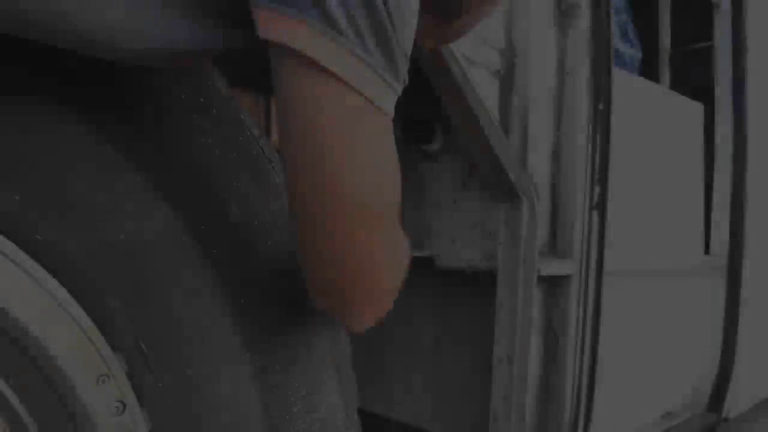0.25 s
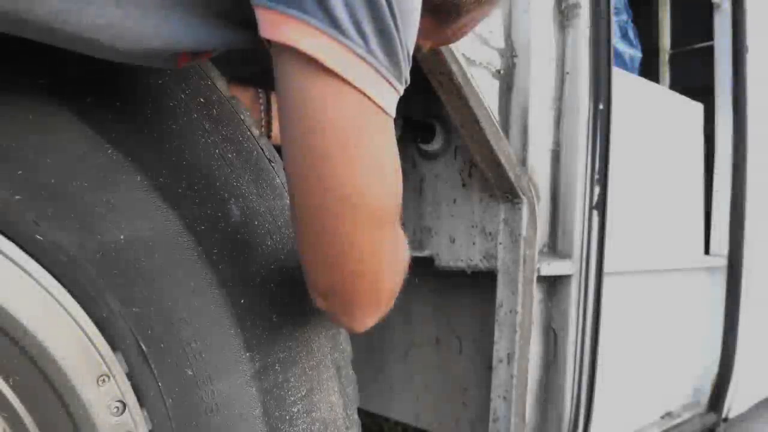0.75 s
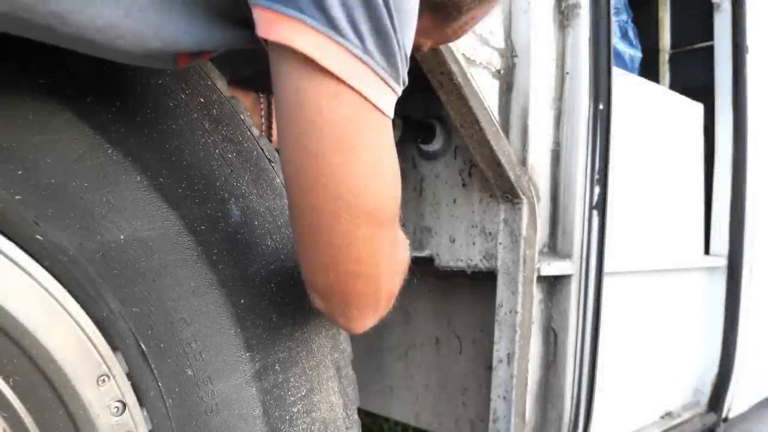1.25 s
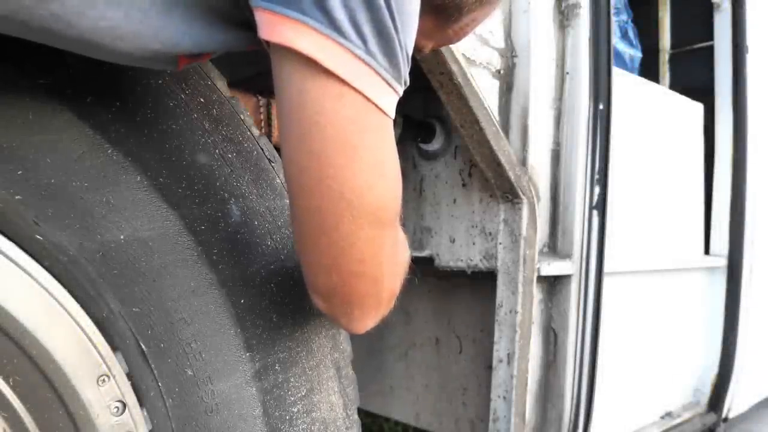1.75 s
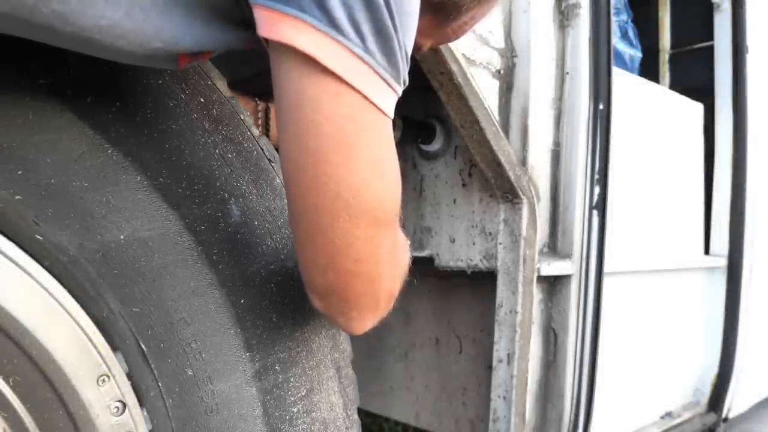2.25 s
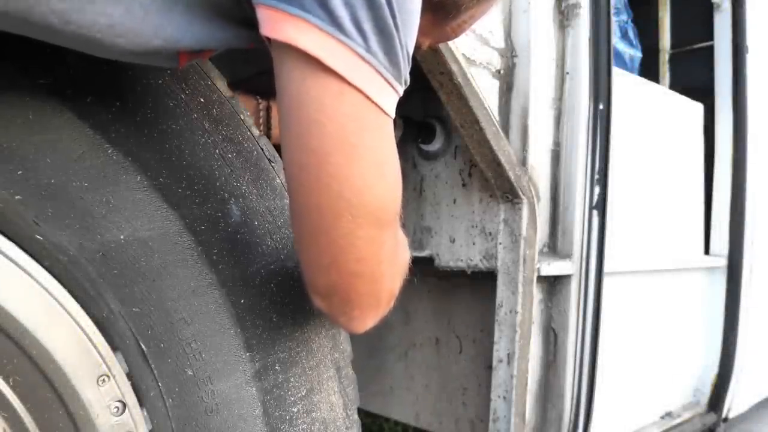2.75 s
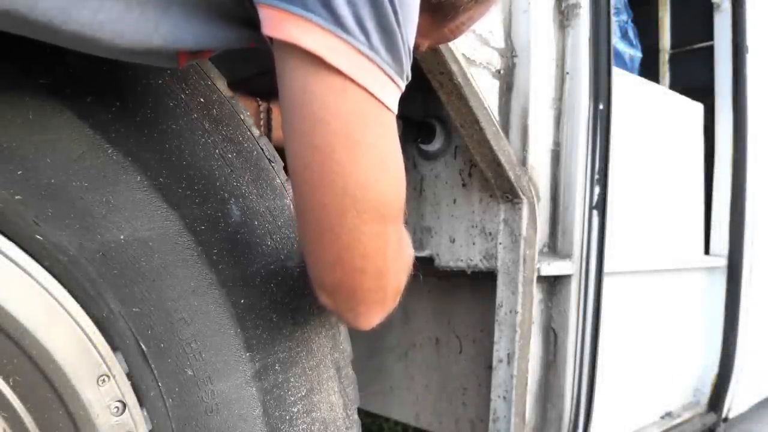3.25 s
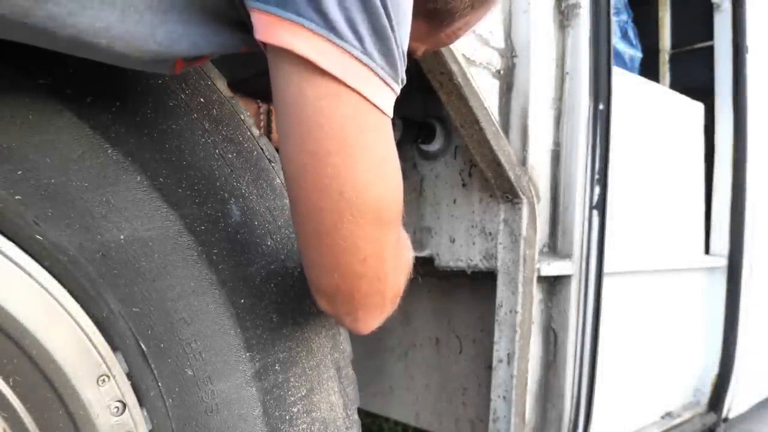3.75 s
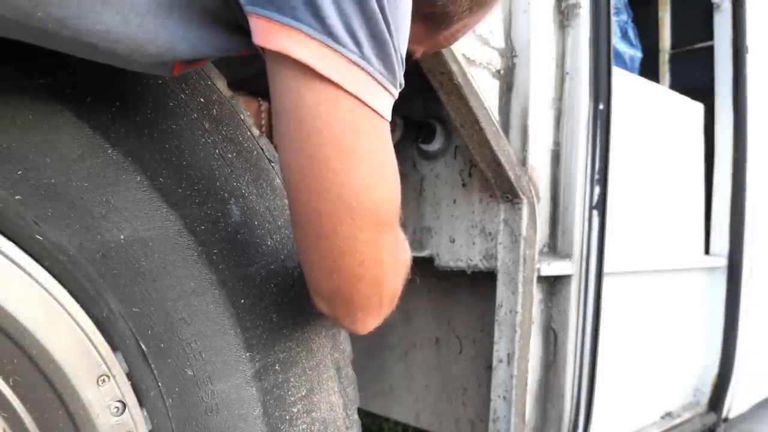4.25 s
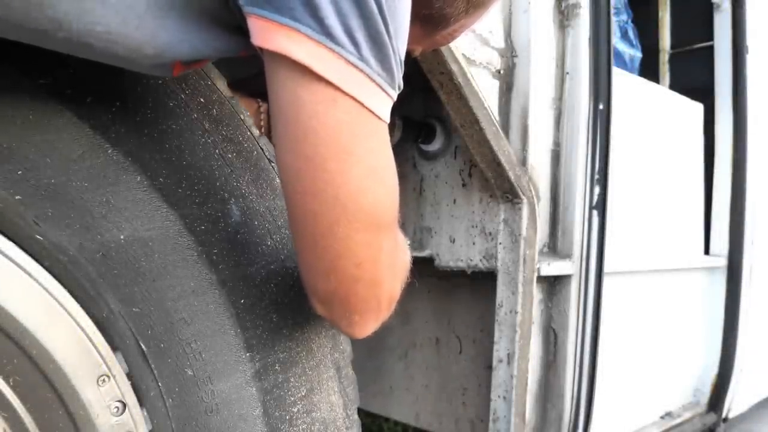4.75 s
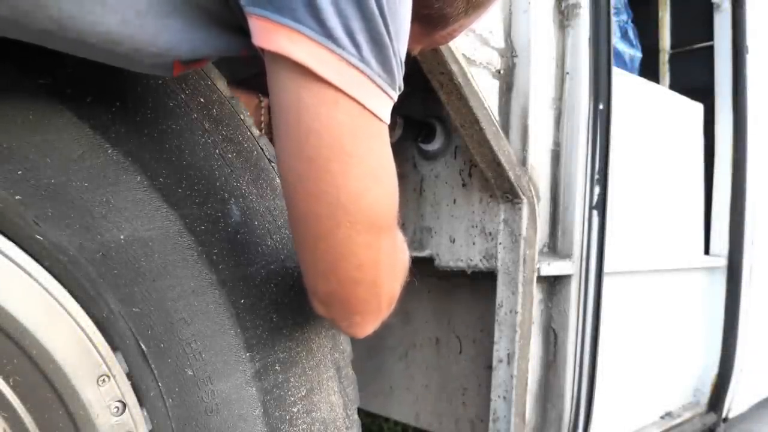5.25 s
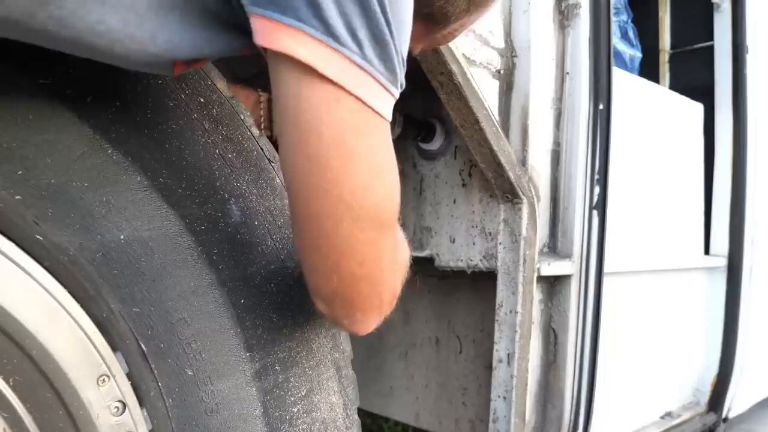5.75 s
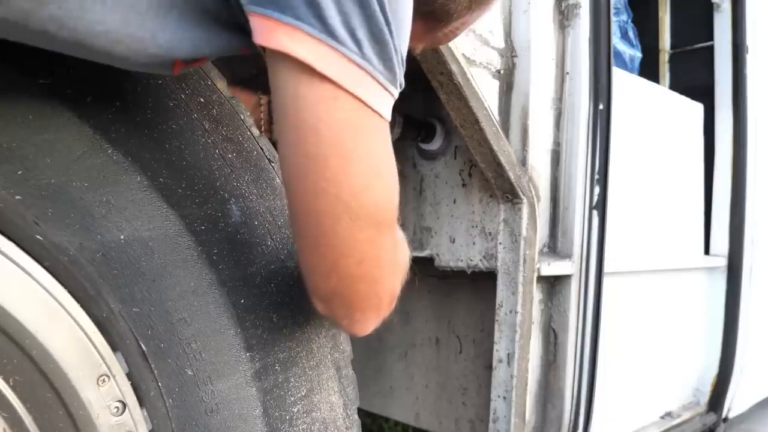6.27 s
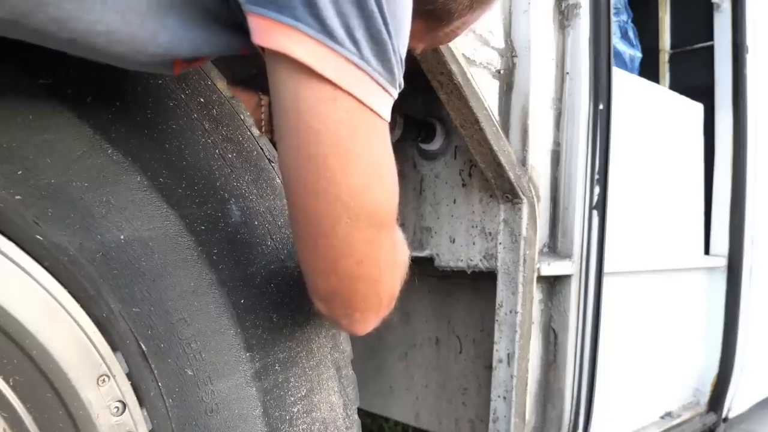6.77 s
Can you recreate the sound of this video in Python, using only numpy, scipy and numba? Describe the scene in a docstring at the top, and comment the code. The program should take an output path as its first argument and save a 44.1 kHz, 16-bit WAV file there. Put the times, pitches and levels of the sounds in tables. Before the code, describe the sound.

An electric drill fades in over the first half second, already grinding a hole saw into a truck's steel wheel arch, outdoors and close to the microphone. Its motor and gears whine over a bright hiss of rushing air. The teeth rasp without pause and bite harder about five times a second, each bite scraping, ringing the sheet and briefly pulling the pitch down. A rough, high squeal comes and goes as the speed wavers. Between about 1.5 and 2.5 seconds the hiss broadens slightly. From 3 to 5 seconds the cut deepens: the whine sinks a little, the dips grow stronger and a faint low drone from the body panels rises. A few bites carry a soft, low thud, most noticeably near 2.4 seconds. The cutting continues to the end at about 7 seconds, centred, with tight reflections and a faint, short tail.

```python
"""A whining mains drill fades in, grinding a hole saw into the steel of a lorry's wheel arch, close by.
The teeth rasp all the time and bite harder once a turn, which rings the sheet and drags the motor down.
Commutator and gears whine over a rush of air and brush noise, and a rough squeal comes and goes with
the motor's speed. Underneath, body panels drone and a few bites come with a soft, low thud. It is
outdoors, with close echoes; a faint, short diffuse tail adds a little stereo width."""
import sys
import numpy as np
from scipy import signal
from scipy.fft import rfft, irfft, next_fast_len
from scipy.io import wavfile
from scipy.ndimage import uniform_filter1d
from numba import njit

SR = 44100
rng = np.random.default_rng(int(sys.argv[2]) if len(sys.argv) > 2 else 0)


def log_audio(samples):
    """Write samples as a 16-bit WAV file to the path given in sys.argv[1]."""
    # one column per channel
    frames = np.atleast_2d(samples).T
    # limit to full scale, then quantise
    limited = np.clip(frames, -1, 1)
    pcm = np.round(limited * 32767).astype(np.int16)
    wavfile.write(sys.argv[1], SR, pcm)


N = 309141

# The teeth catch once a turn of the saw. Each row: middle in seconds, knock in relative dB,
# scrape in relative dB, length in seconds, snag just before in relative dB, motor sag in Hz.
BITES = [(0.179, -27.5, -24.5, 0.048, -45, 3), (0.395, -21, -25, 0.029, -19.5, 6.8),
         (0.597, -25.5, -32, 0.05, -52, 11), (0.793, -20.5, -23.5, 0.049, -22, 9.1),
         (0.992, -29, -32, 0.038, -23, 5), (1.198, -19.5, -23.5, 0.036, -43, 3.8),
         (1.397, -17.5, -21.5, .038, -28, 5), (1.609, -19, -22.5, 0.041, -38, 4.96),
         (1.811, -21, -20.5, 0.026, -22, 1.83), (2.009, -21, -21.5, 0.042, -35, 8.2),
         (2.222, -20.5, -21, 0.034, -18.5, 6), (2.419, -18.5, -21, .028, -25, 7),
         (2.629, -25, -25.5, 0.039, -38, 12), (2.841, -23.5, -23.5, 0.047, -29, 16.9),
         (3.049, -19.5, -22.5, 0.036, -18.5, 9), (3.243, -17, -19.5, 0.047, -34, 4.3),
         (3.463, -28.5, -29, 0.051, -24.5, 9.7), (3.688, -21.5, -30, 0.043, -26, 14.3),
         (3.86, -22.5, -27, 0.035, -44, 13.8), (4.112, -22, -21, 0.031, -25, 19),
         (4.318, -18.5, -20, 0.034, -18.5, 13), (4.536, -24.5, -27, 0.036, -20.5, 11.3),
         (4.744, -23.5, -32, 0.027, -22, 9), (4.929, -23.5, -27, 0.038, -40, 14.4),
         (5.151, -27, -27, 0.03, -44, 15), (5.382, -19.5, -22.5, 0.041, -35, 11.2),
         (5.592, -20.5, -25, 0.03, -29, 8.5), (5.803, -26.5, -30, 0.023, -32, 15.7),
         (6.03, -22, -22.5, 0.028, -29, 15.4), (6.254, -21.5, -23, .036, -40, 15.6),
         (6.471, -24, -26, 0.037, -38, 14), (6.681, -22.5, -23, .022, -40, 13),
         (6.911, -22.5, -20.5, 0.033, -40, 15)]
# The cut gets deep and loads the drill. Each row: time in seconds, depth from 0 to 1.
CUT_DEPTH = [(3.0, 0), (5.2, 1)]
# Level ride of the air and brush noise. Each row: time in seconds, relative level in dB.
RUSH_LEVEL = [(.4, -22), (1.0, -20), (1.6, -21), (1.68, -25.5), (1.85, -22.5), (2.0, -22), (2.3, -24),
              (2.8, -22), (3.2, -22.5), (3.3, -25), (3.45, -22.5), (4.0, -21), (5.2, -20.5), (6.5, -21.5),
              (7.0, -20.5)]


def undb(db):
    """Decibels to gain."""
    return 10 ** (np.asarray(db) / 20)


def unit(x):
    """Scale to rms 1."""
    return x / np.sqrt(np.mean(x ** 2))


def curve(rows):
    """Join (seconds, value) rows by straight lines."""
    return np.interp(np.arange(N) / SR, *np.transpose(rows))


def wander(rate):
    """Smooth random movement that changes about rate times a second; rms 1."""
    hold = max(int(SR / rate), 2)
    steps = np.repeat(rng.standard_normal(N // hold + 1), hold)
    return unit(uniform_filter1d(steps, hold)[:N])


def filtered(x, response):
    """Pass x through a response given as a function of frequency."""
    size = next_fast_len(N + 8192, True)
    hz = np.arange(size // 2 + 1) * SR / size + 1e-6
    return irfft(rfft(x, size) * response(hz), size)[:N]


def colour(x, points):
    """Equalise x along (Hz, dB) points."""
    hz, db = np.transpose(points)
    return filtered(x, lambda f: undb(np.interp(np.log(f), np.log(hz), db)))


def ring(x, modes):
    """Drive (Hz, width in Hz, dB) resonances with x."""
    return sum(undb(db) * signal.lfilter(*signal.iirpeak(hz, hz / width, fs=SR), x)
               for hz, width, db in modes)


def motor_speed(fall_s=.031, recover_s=.046, rub_hz=5.7, rub_after_s=.1048, rub_s=.037):
    """Turns per second: each bite drags the motor down; deep in the cut the cup's far side rubs too."""
    # Speed between bites, falling as the drill is pressed harder. Each row: time in seconds, speed in Hz.
    base_speed = [(0, 339.5), (.4, 341.5), (.7, 335.8), (1.1, 326.6), (1.5, 330), (1.8, 333), (2.6, 331.7),
                  (3.1, 323.4), (3.35, 329.4), (3.7, 320.5), (4.4, 320.3), (5.1, 315.5), (5.6, 312.2),
                  (7, 314.1)]
    # The motor is slowest just ahead of a bite. Each row: time in seconds, lead in seconds.
    sag_lead = [(.5, 0.034), (1.95, .048), (2.3, 0.017), (3.45, 0.016), (3.69, 0.038), (3.86, 0.005),
                (4.3, .03), (4.7, .07), (5.4, 0.0337), (6.0, 0.058), (7, 0.074)]
    t, hz, depth = np.arange(N) / SR, curve(base_speed), curve(CUT_DEPTH)
    for middle, *_, sag_hz in BITES:
        since = t - middle + np.interp(middle, *np.transpose(sag_lead))
        near = abs(since) < .25
        since = since[near]
        hz[near] -= sag_hz * np.exp(-(since / np.where(since < 0, fall_s, recover_s)) ** 2)
        hz[near] -= rub_hz * depth[near] ** 2 * np.exp(-((since - rub_after_s) / rub_s) ** 2)
    return hz


def rush(turns, trim_db=-1.5):
    """Air and brush noise that pulses with the shaft and broadens as the saw sinks in."""
    # Its colour as the cut starts, and once the saw has sunk in. Each row: frequency in Hz, gain in dB.
    early_colour = [(100, -35), (1400, -30), (2400, -4), (2780, -8), (3030, -2.5), (3310, -6.5),
                    (3800, -0.5), (4960, 3), (5600, -1), (6470, -3.5), (7980, -7.5), (8500, -10),
                    (10700, -16.5), (11500, -22), (14300, -22), (15500, -38)]
    late_colour = [(100, -33), (1400, -22), (2400, -7), (3000, -4), (3410, -11.5), (3800, -3.5),
                   (4280, -2.5), (4660, -2), (5360, 0.5), (5890, -9), (6350, -8), (7160, -8), (10500, -17),
                   (13600, -23.5), (15500, -29)]
    # The teeth sink in all round. Each row: time in seconds, share of the late colour from 0 to 1.
    sinking = [(1.4, 0.04), (2.4, 0.92)]
    noise = rng.standard_normal(N) * (1 + .08 * np.cos(2 * np.pi * turns))
    sunk = curve(sinking)
    air = (1 - sunk) * unit(colour(noise, early_colour)) + sunk * unit(colour(noise, late_colour))
    flutter_db = .55 * wander(80)
    return air * undb(curve(RUSH_LEVEL) + flutter_db + trim_db)


def cup_and_arch(air):
    """The rush rings the saw's cup and the drill's housing, then bounces off tyre and wheel arch."""
    # Cup and housing resonances. Each row: frequency in Hz, width in Hz, gain in dB.
    cup_modes = [(1798, 194, 8.5), (4900, 110, -15), (6270, 260, -3), (7560, 110, -7), (12900, 400, -11)]
    # Close reflections. Each row: delay in seconds, gain.
    echoes = [(.0017, .1), (.0107, .12)]
    hollow = air + ring(air, cup_modes)
    return filtered(hollow, lambda f: 1 + sum(gain * np.exp(-2j * np.pi * f * s) for s, gain in echoes))


def shaft_tone(turns, order, db):
    """A tone locked to a multiple of motor speed; play in the gears makes its phase flutter."""
    phase = 2 * np.pi * (order * turns + rng.random()) + .2 * wander(200) + .35 * wander(35)
    return np.sqrt(2) * undb(db) * np.sin(phase)


def whine(hz, turns, swell_db_per_hz=.04, flicker_db=3.0, with_rush=.89):
    """Gear and commutator tones ride with the rush, swell between bites and rebalance in the deep cut."""
    # The whine's partials. Each row: multiple of motor speed, base level in dB, change in dB when deep.
    partials = [(0.8, -49, 4), (9, -39, -4), (11.2, -42, -14), (12, -35.7, .7), (12.8, -36, .5),
                (13.6, -40, -7), (14.4, -39, -1), (15.2, -33.5, .5), (16, -42, 2), (16.8, -38.5, -.5),
                (18, -41, 5), (19.2, -39, -6), (20, -40.5, 3.5), (21.6, -46, -7), (23.2, -43, 4),
                (24, -47, -1), (24.8, -48, -1), (31.2, -54, 1)]
    # One partial sings out for a moment.
    # Each row: middle in seconds, multiple of motor speed, rise in dB, half length in seconds.
    surges = [(.22, 12.8, 7, .12), (.75, 12.8, 3, .15), (1.2, 13.6, 7, .35), (1.38, 15.2, 6.5, .16),
              (2.65, 12, 6, .27), (3.15, 12, 7, .12), (4.0, 15.2, 3, .35)]
    t, depth, rush_db = np.arange(N) / SR, curve(CUT_DEPTH), curve(RUSH_LEVEL)
    recovery_hz = hz - uniform_filter1d(hz, SR // 5)
    shared_db = swell_db_per_hz * recovery_hz + with_rush * (rush_db - rush_db.mean())
    out = 0
    for order, level_db, deep_db in partials:
        db = level_db + deep_db * depth + shared_db + flicker_db * wander(30)
        db += sum(rise_db * np.exp(-((t - middle) / half) ** 2)
                  for middle, multiple, rise_db, half in surges if multiple == order)
        out = out + shaft_tone(turns, order, db)
    return out


def squeal(hz, turns, order=9, centre_hz=2760, width_hz=155, level_db=-30, rough_db=3.0):
    """One motor harmonic squeals roughly whenever the sagging speed pulls it into a saw resonance."""
    detune = (order * hz - centre_hz) / (width_hz / 2)
    resonance_db = -10 * np.log10(1 + detune ** 4)
    drag_db = .38 * (uniform_filter1d(hz, SR // 5) - hz)
    return shaft_tone(turns, order, level_db + resonance_db + drag_db + rough_db * wander(70))


def chips(per_s):
    """Dense snaps of either sign, as chips tear off the steel."""
    hit = rng.random(N) < per_s / SR
    return unit(hit * rng.choice([-1, 1], N) * (1 + rng.random(N)))


def saw(turns, tooth_db=1.6, knock_db=4.0, scrape_db=4.0, bite_rasp_db=4.5, grind_ring_db=1.0):
    """Chips tear off tooth by tooth; knocks ring the sheet's low modes, scrapes the high ones."""
    # Steady pressure on the saw. Each row: time in seconds, relative grinding level in dB.
    feed = [(0, -28.5), (.6, -25), (1.3, -28), (2.5, -27.5), (3.4, -28), (4.3, -26.5), (5.5, -28.5),
            (7, -27.5)]
    # Modes of the steel sheet. Each row: frequency in Hz, width in Hz, gain in dB.
    sheet_modes = [(258.5, 20, -1.5), (377, 22, -2.5), (443, 45, 0.5), (501, 16, 6.5), (552, 83, -1),
                   (659, 93, 0.5), (761, 17.6, 10), (810.5, 37, 7), (853, 23, 2.5), (936, 54, 0),
                   (1058, 63, -5.5), (1225, 137, -3), (1342, 43, 5), (1614, 51, -0.5), (1794, 36, -6.5),
                   (1886, 103, 0.5), (2186, 230, -3.5), (2745, 290, -10)]
    # Colours of a knock's contact force and of the teeth's rasp. Each row: frequency in Hz, gain in dB.
    knock_colour = [(150, -4.5), (480, -3.5), (780, 2.5), (1100, -9.5)]
    rasp_colour = [(25, -50), (70, -34), (130, -50), (400, -21), (1000, -5), (2500, -10), (4500, -7),
                   (8000, -40), (15000, -65)]
    split_hz = 1100
    low_modes = [mode for mode in sheet_modes if mode[0] < split_hz]
    high_modes = [mode for mode in sheet_modes if mode[0] >= split_hz]
    teeth = undb(tooth_db * np.sin(2 * np.pi * turns * .27 + .92 * wander(30)))
    grind = undb(curve(feed) + 1.4 * wander(45))
    knock, scrape = bite_forces()
    snaps = chips(per_s=6000) * teeth
    blows = colour(chips(per_s=6000), knock_colour) * knock * undb(knock_db)
    low = ring(snaps * grind * undb(grind_ring_db) + blows, low_modes)
    high = ring(snaps * np.hypot(grind, scrape * undb(scrape_db)), high_modes)
    rasp = colour(chips(per_s=12000) * teeth, rasp_colour)
    direct = rasp * np.hypot(grind, scrape * undb(bite_rasp_db))
    # a steady force of 0 dB comes out near rms 1
    return (low + high + direct) / np.std(ring(snaps, sheet_modes) + rasp)


def drone(start_db=-46.5, middle_db=-41.5, end_db=-38.5):
    """The shaking drill sets the big panels humming, more so as the saw sinks in."""
    # Body panel resonances. Each row: frequency in Hz, width in Hz, gain in dB.
    panel_modes = [(127.4, 5.5, -6.5), (143.3, 9, 1), (200.5, 26, -6.5), (245, 59, -11), (345, 14, -3.5),
                   (437, 28, 2.5)]
    hum = unit(ring(rng.standard_normal(N), panel_modes))
    return hum * undb(curve([(0, start_db), (3.0, middle_db), (5.2, end_db)]))


def bite_forces(grab_db=2.0, release_power=1.67, snag_lead_s=.034, snag_s=.014, snag_knock_db=-3):
    """Knock and scrape envelopes: a tooth snags, then the saw bites; each grabs fast, lets go softly."""
    t, force = np.arange(N) / SR + .00094, np.zeros((2, N))
    for bite_s, knock_db, scrape_db, length, snag_db, _ in BITES:
        snag = (bite_s - snag_lead_s, snag_s, [snag_db + snag_knock_db, snag_db])
        bite = (bite_s, length, [knock_db, scrape_db])
        for middle, span, levels in (snag, bite):
            near = abs(t - middle) < 2 * span
            offset = (t[near] - middle) / (.58 * span)
            surge = np.exp(-np.where(offset < 0, offset ** 4, abs(offset) ** release_power))
            force[:, near] += np.outer(undb(levels), surge) * undb(grab_db)
    return force


def thuds(half_length_s=.015, top_hz=70):
    """A few bites come with a soft, low thud."""
    # Short swells of rumble. Each row: middle in seconds, level in dB.
    swells = [(.38, -53), (1.79, -48), (2.41, -41), (2.85, -50), (3.05, -47), (4.32, -50)]
    t = np.arange(N) / SR
    rumble = unit(signal.sosfilt(signal.butter(2, top_hz, fs=SR, output="sos"), rng.standard_normal(N)))
    return rumble * sum(undb(db) * np.exp(-((t - middle) / half_length_s) ** 2) for middle, db in swells)


def stereo_width(mid, decay_s=.35, predelay_s=.02):
    """A faint, short diffuse tail that adds a little stereo width."""
    # Colour of the side signal. Each row: frequency in Hz, gain in dB.
    side_colour = [(60, -17), (200, -19), (500, -22), (4000, -21), (9000, -17)]
    t = np.arange(SR // 4) / SR
    tail = rng.standard_normal(len(t)) * undb(-60 * t / decay_s) * (t > predelay_s)
    return colour(signal.fftconvolve(mid, tail / np.linalg.norm(tail))[:N], side_colour)


def scene():
    """Drill and saw sit in the centre, with a little stereo width."""
    hz = motor_speed()
    turns = np.cumsum(hz) / SR
    air = cup_and_arch(rush(turns))
    low_cut = signal.butter(3, 95, "high", fs=SR, output="sos")  # thin panels radiate little bass
    steel = signal.sosfilt(low_cut, saw(turns) + drone())
    mid = air + whine(hz, turns) + squeal(hz, turns) + steel + thuds()
    side = stereo_width(mid)
    return np.array([mid + side, mid - side])


@njit
def follow(x, attack, release):
    """Envelope follower with separate rates for rising and falling."""
    out, level = np.empty(len(x)), 0.
    for i in range(len(x)):
        level += (x[i] - level) * (attack if x[i] > level else release)
        out[i] = level
    return out


def record(dry):
    """Gain control ducks the hardest bites and peaks are rounded; then the fade-in and the top cut."""
    # The fade-in. Each row: time in seconds, gain.
    fade_in = [(0, 0.0055), (.04, 0.00059), (.1, 0.18), (.2, 0.49), (.3, 0.81), (.38, 1)]
    threshold_db, attack_s, release_s = -15.5, .005, .06
    ceiling, top_hz = .68, 15500
    envelope = follow(abs(dry.mean(axis=0)), 1 / (attack_s * SR), 1 / (release_s * SR))
    ducked = dry * np.minimum(1, undb(threshold_db) / (envelope + 1e-9)) ** .5  # 2:1 ratio
    rounded = ducked / (1 + (ducked / ceiling) ** 8) ** (1 / 8)
    top_cut = signal.ellip(10, .2, 80, top_hz, fs=SR, output="sos")
    return signal.sosfilt(top_cut, rounded * curve(fade_in))


dry = scene()
out = record(dry)
log_audio(out)
```